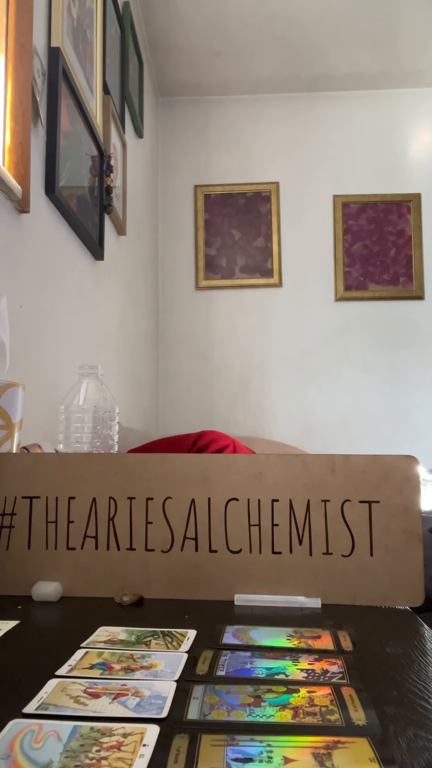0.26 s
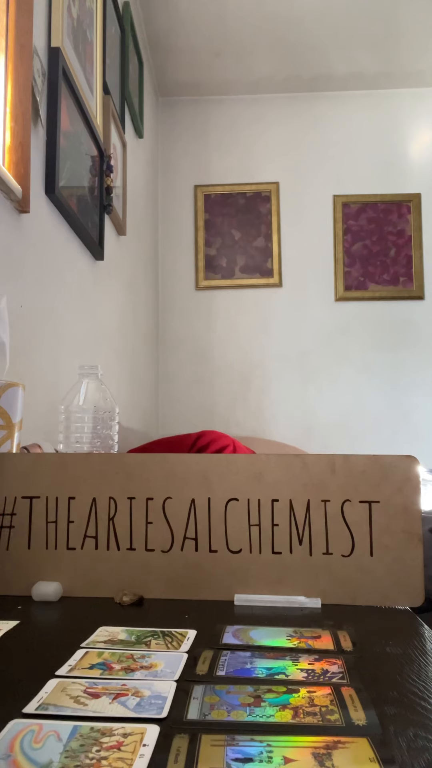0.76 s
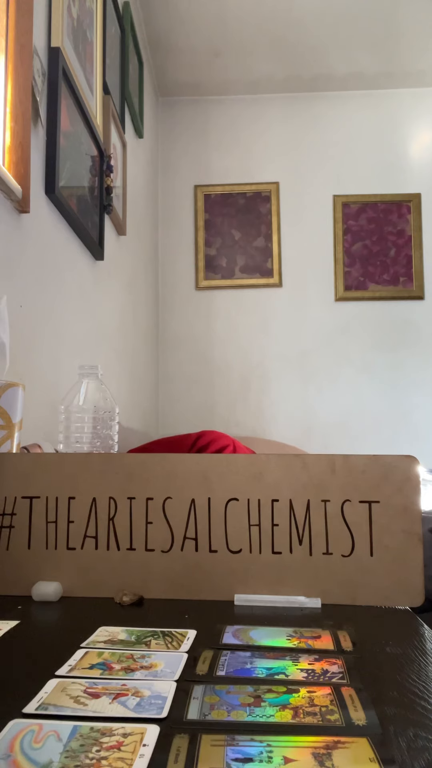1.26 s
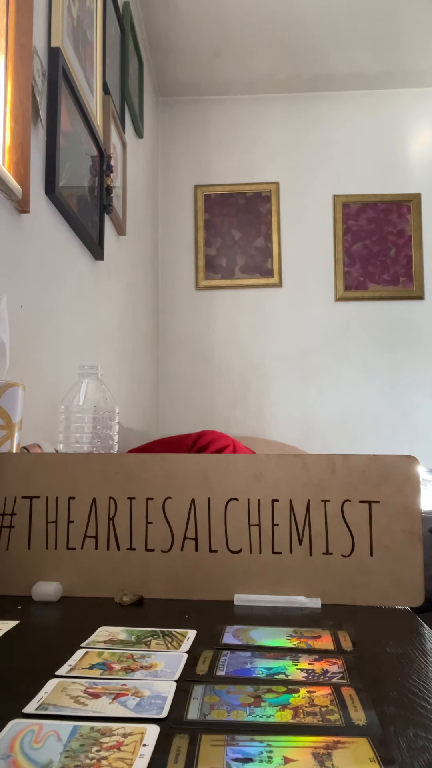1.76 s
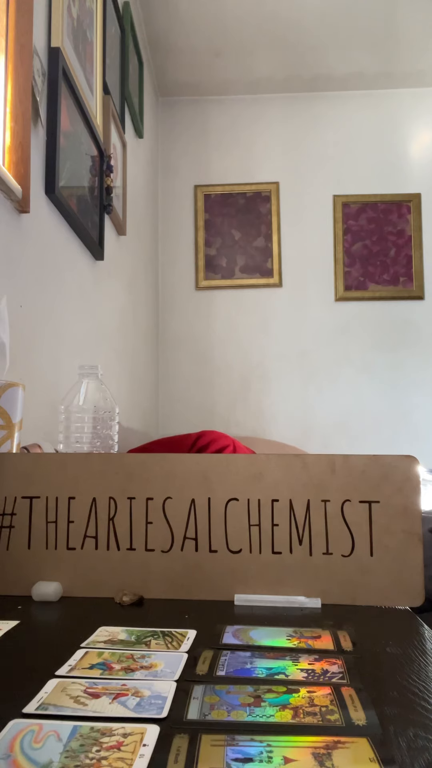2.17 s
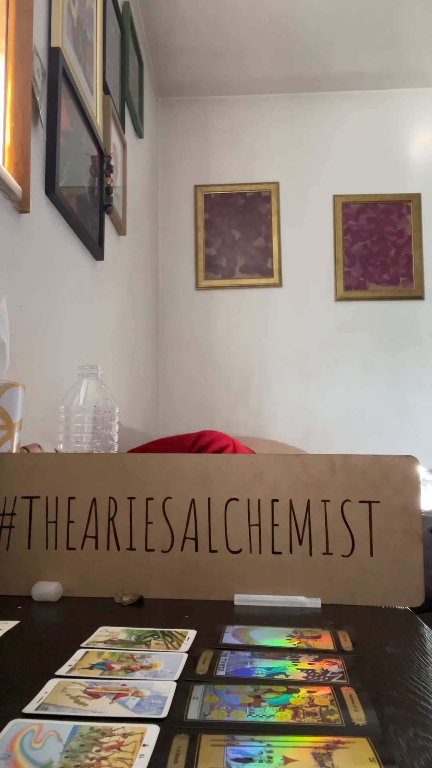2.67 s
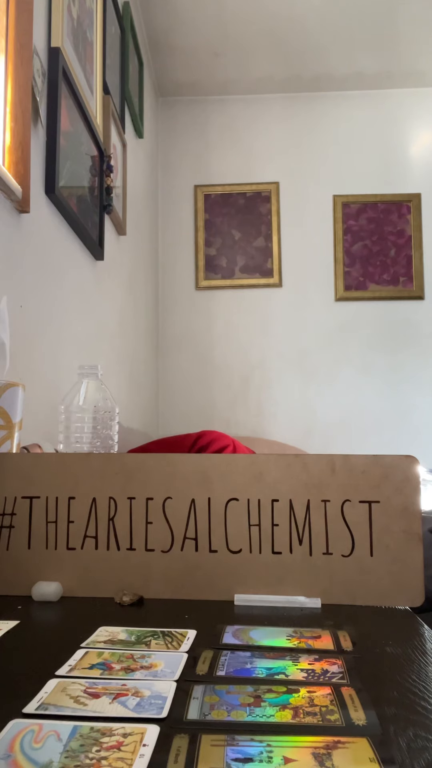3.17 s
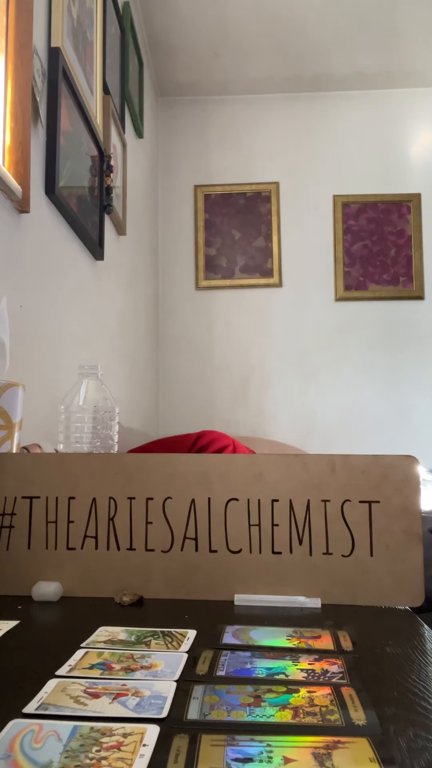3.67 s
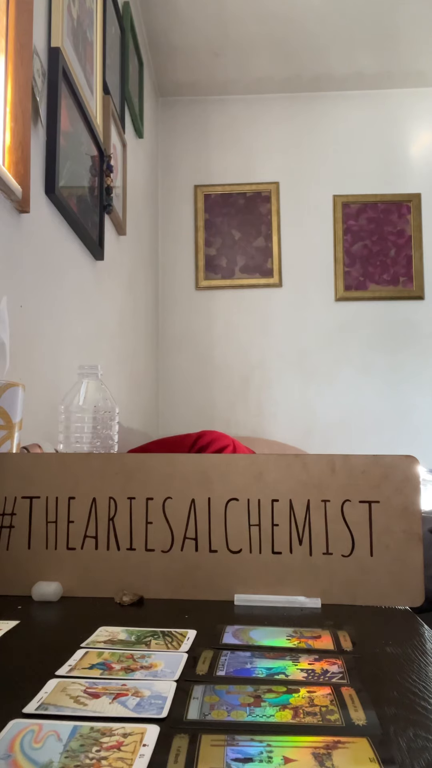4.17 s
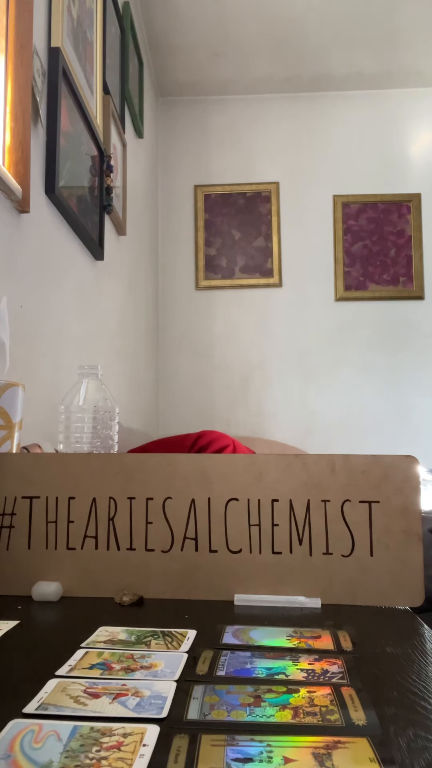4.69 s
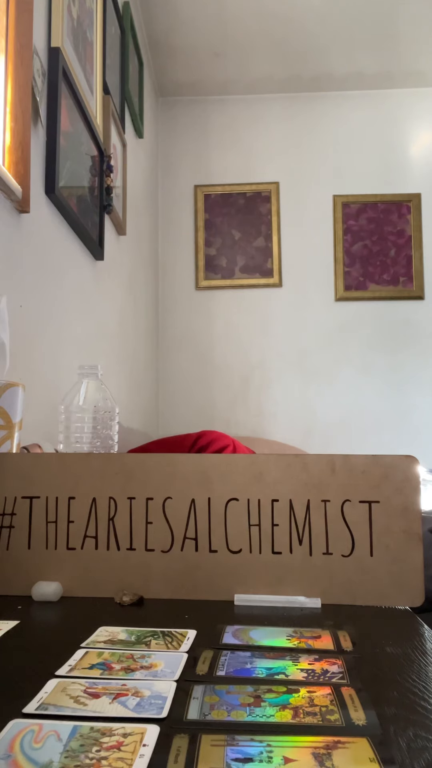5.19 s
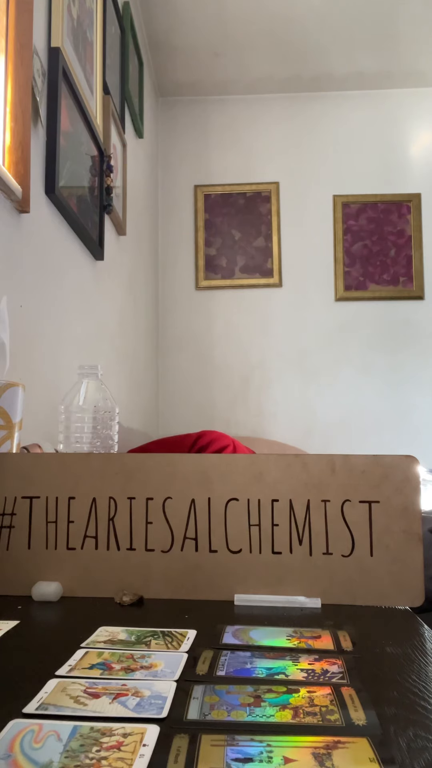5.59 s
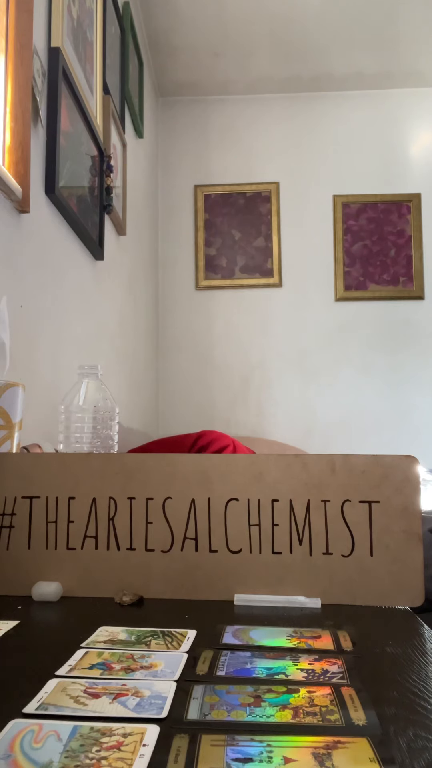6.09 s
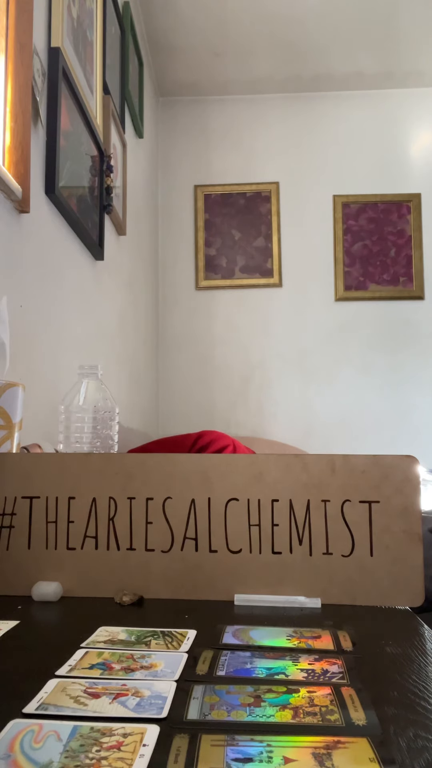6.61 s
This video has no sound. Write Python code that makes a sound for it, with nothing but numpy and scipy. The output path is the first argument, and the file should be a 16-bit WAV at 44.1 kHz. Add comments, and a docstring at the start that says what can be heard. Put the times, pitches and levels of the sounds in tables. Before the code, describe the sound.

A quick, bright clatter of card packets slapping together opens at once, with short room echoes and low bumps on the table. Softer taps and a sliding rub follow, with a brief renewed snapping before two seconds. The rest is near silence: sparse ticks, slight card friction and faint room hum, until a lone sharper click at six seconds. Close stereo pickup.

```python
"""A quiet room: behind a cardboard screen a deck of stiff cards is shuffled by hand, then held and shifted.
Packets slap and snap: ringing clicks with a deck thump and an edge crack, followed by room echoes.
Card faces slide on each other as clumped friction grains; the table rumbles in noise under the hands.
Two microphone ports hear the cards with different phase; below lie a faint noise hum and a low sine tone."""
import sys
import numpy as np
from scipy import signal
from scipy.fft import rfft, irfft, next_fast_len
from scipy.io import wavfile

SR = 44100
rng = np.random.default_rng(int(sys.argv[2]) if len(sys.argv) > 2 else 0)


def inscribe(sig):
    """Save sig as 16-bit PCM at rate SR to the path in sys.argv[1].

    A 1-D sig is mono; a 2-D sig holds one channel per row.
    Samples are clipped to [-1, 1] before scaling.
    """
    pcm = np.round(np.clip(np.atleast_2d(sig).T, -1, 1) * 32767)
    wavfile.write(sys.argv[1], SR, pcm.astype(np.int16))


N = 302085      # samples
COARSE_STEP = 16      # samples between points of a movement's envelope

# Card snaps. Each row: time in seconds, peak in dB, ring in Hz, thump peak in dB re the snap peak,
# crack peak in dB re the snap peak, left over right in dB.
CARD_SNAPS = [(.1411, -28, 2800, -7.5, -16, -5), (.1555, -7.5, 2260, -11, -10, 0),
              (.1604, -7.5, 2310, -16, -15, 0), (.175, -17.5, 2320, -13.5, -7, -.5),
              (.2056, -1.5, 2200, -28, -13.5, 1.5), (.2338, -22.5, 2240, -21.5, -17, -1.5),
              (.2519, -10.5, 2670, -13, -7.5, -1.5), (.2611, -10, 2380, -18, -12, 0),
              (.2648, -10, 2030, -16.5, -20, 4), (.3411, -32, 2840, -4, -30.5, -3.5),
              (.3544, -36, 2150, -2, -21, 1.5), (.3825, -32, 2190, -3.5, -27.5, -3),
              (.402, 0, 2213, -17, -11, 1.5), (.4158, -15, 3600, -17, -20, 10),
              (.4374, -20.5, 2170, -4, -3, -2), (.4721, -5.5, 2250, -19.5, -9, 1),
              (.4874, -17.5, 3450, -25.5, -9.5, -3.5), (.5332, -18, 2140, -5, -13.5, 0),
              (.596, -7.5, 2250, -15.5, -11, 2), (.6136, -22.5, 4200, -13, -12, -1),
              (.632, -9.5, 2480, -10, -11.5, -1), (.6956, -10.5, 2710, -14.5, -6.5, 0),
              (.7316, -3.5, 2560, -15.5, -8, -3), (.7398, -5.5, 2390, -26, -34, 2),
              (.7464, -10, 2440, -26, -26, 2), (.7732, -20, 2540, -28.5, -36.5, 3.5),
              (.8108, -20, 2500, -10, -9, .5), (.856, -18.5, 2280, -29, -14, 2.5),
              (.8762, -4, 2806, -22, -14.5, -0.5), (.8854, -14, 2120, -7, -13.5, -1),
              (.9351, -24, 2240, -7.5, -3, 1), (.98, -19, 4700, -14, -26.5, -6),
              (.9887, -21.5, 1700, -10, -20.5, -3.5), (1.0015, -12, 1490, -12, -11.5, .5),
              (1.0157, -14, 2520, -14.5, -22, -1), (1.0285, -12, 2530, -8.5, -17.5, 0.5),
              (1.0365, -8, 2370, -3.5, -8, 0), (1.0414, -6, 2350, -22.5, -11, 8),
              (1.0518, -11, 1314, -10.5, -18, -9.5), (1.0661, -18.5, 2640, -13, -28, 2),
              (1.175, -25.5, 1530, -6, -47, 6), (1.3054, -38, 2450, -3.5, -6, 4.5),
              (1.3698, -28, 3720, -35, -4, -5.5), (1.381, -40, 1400, -12, 1, 0),
              (1.475, -28.5, 2560, -13, -9, -2), (1.5836, -29, 2520, -24, -11, -2),
              (1.611, -22, 2050, -21.5, -17.5, 0), (1.6509, -24, 1680, -11.5, -26, -4.5),
              (1.748, -13.5, 2640, -15, -15.5, -2), (1.7614, -10, 2580, -18.5, -10.5, -1),
              (1.7679, -13.5, 2750, -12, -12, -3.5), (1.7826, -28, 2560, -12, -10, 4.5),
              (1.8096, -32.5, 2440, -6.5, -25, -10.5), (1.8246, -36, 2920, -3, -28, 12.5),
              (1.8362, -17.5, 2480, -14, -36, 0), (1.8676, -28.5, 1460, -12, -30, 1),
              (1.9394, -24, 2680, -4.5, -3, 2.5), (2.0313, -30, 2270, -21, -33, -3),
              (2.1615, -46.5, 2080, -23, -28, -8), (2.4969, -43, 2960, 1, -12, 0),
              (2.547, -37, 2300, -23, -25, 4), (2.6448, -43, 2430, -9, -3, 6),
              (2.819, -40.5, 2390, -11.5, -24, 4), (2.9077, -23, 3210, -40, -16, 3),
              (3.034, -46.5, 2944, -11, -19, 8), (3.1058, -49.5, 3040, -31, -29.5, -6),
              (3.3039, -45, 2230, -38.5, -22.5, 11.5), (3.3558, -47, 2130, -14, -16.5, 4.5),
              (3.6196, -51.5, 1566, -21, 2, 1), (3.9943, -54, 2840, -27.5, -13, 3),
              (4.2676, -47.5, 2140, 1, -8, 5), (4.8045, -50.5, 1423, -21, -11, 4),
              (5.8341, -46, 2300, -1, -35, 5), (5.973, -35.5, 1530, -8, -9, -1),
              (6.002, -39, 2077, -28, -6, -20), (6.0096, -13.5, 3350, -27.5, -15.5, 10),
              (6.0864, -39, 2620, -3, -22, 2), (6.4017, -51.5, 1984, 0, -16.5, 3),
              (6.614, -50.5, 2500, -7, -25, 0), (6.807, -27, 2415, -21, -13, 3)]
# Colour of snaps. Each row: frequency in Hz, spectral level in dB per Hz.
SNAP_COLOUR = [(88, -43.5), (150, -16.5), (343, -10.5), (425, -10.5), (560, -8.5), (814, -9), (1070, -18),
               (1560, -12.5), (2010, -12.5), (2220, -12), (3290, -16), (3930, -10.5), (5270, -14.5),
               (9890, -24.5), (16500, -39.5)]
SNAP_T60_S, SNAP_RISE_S = .028, .0014      # both scaled per band by a stretch
RING_DB_AT_0_DB_PEAK, RING_DB_PER_DB_SOFTER, RING_WIDTH_HZ = 8.5, .21, 88.0
TICK_DB, CLICK_SPREAD_DB = 13.0, 1.5


def snaps():
    """A landing packet ticks and sprays edge clicks; air between cards rings, deck thumps, edges crack."""
    lead, size = 1024, 4096      # samples before the landing, samples in all
    out = np.zeros((2, N + size))
    t = (np.arange(size) - lead) / SR
    hz = np.arange(size // 2 + 1) * SR / size
    to_ports = path(hz, SNAP_COLOUR)
    own_share = at_hz(PORT_DIFFERENCE, hz, axis=2)
    low, middle, high = split(hz)
    for time_s, peak_db, ring_hz, thump_db, crack_db, pan_db in CARD_SNAPS:
        unevenness_db = CLICK_SPREAD_DB * rng.standard_normal(size // 32).repeat(32)
        spray = rng.standard_normal((3, size)) * from_db(unevenness_db)
        spray[0, lead] += from_db(TICK_DB)      # the leading edge touches first
        # a softer snap rings purer
        ring_db = RING_DB_AT_0_DB_PEAK - RING_DB_PER_DB_SOFTER * peak_db
        main_ring = resonance(hz, ring_hz, RING_WIDTH_HZ, ring_db)
        weaker_gap = resonance(hz, ring_hz * rng.uniform(.6, 1.8), 400, 2)      # new each time
        ring = main_ring * weaker_gap
        first = round(time_s * SR) - lead
        pan = np.array([[.5], [-.5]]) * pan_db
        # lows last longer, the crack dies first
        for band_db, band, stretch in [(0, middle * ring, 1), (thump_db, low, 1.3), (crack_db, high, .6)]:
            rise_s = np.clip(SNAP_RISE_S * stretch, .0001, .005)
            t60_s = np.clip(SNAP_T60_S * stretch, .004, .09)
            swell = np.exp(np.minimum(t, 0) / rise_s)
            decay = from_db(-60 * np.maximum(t, 0) / t60_s)
            spectrum = rfft(spray * swell * decay)
            heard = spectrum[0] + own_share * spectrum[1:]      # shared part plus each port's own
            part = irfft(heard * to_ports * band, size)
            part = part / np.sqrt(np.mean(np.max(part ** 2, axis=1)))
            out[:, first:first + size] += from_db(peak_db + band_db + pan) * part
    return out[:, :N]


# Strokes of card over card. Each row: start in seconds, length in seconds, rub level in dB,
# change over the stroke in dB, lows in dB re rub, treble in dB re rub, swish centre in Hz.
SLIDE_STROKES = [(0, .01, -64, -5.5, 2, -36, 1580), (0.171, .12, -51.5, -9, 8, -2, 2250),
                 (.35, 0.23, -54.5, 12.5, -6.5, -12.5, 2410), (0.65, 0.28, -44, 5, -5, -19, 2360),
                 (0.88, 0.21, -43, 0.5, -2, -13.5, 2160), (1.151, 0.029, -51.5, -1.5, 2.5, -21, 1610),
                 (1.189, 0.15, -60, 4.5, -6.5, -7.5, 2530), (1.396, 0.15, -55, 14, -11, -12, 2500),
                 (1.6, .05, -48, 0, -10, -15, 1950), (1.653, 0.073, -43, 2, -7.5, -13, 2100),
                 (1.793, 0.17, -38.5, -4, -4, -13.5, 2080), (2.042, 0.097, -60.5, -1, -3.5, -13, 2000),
                 (2.171, 0.09, -54.5, -2, -16, -11.5, 2700), (2.308, 0.091, -58.5, 6.5, -11.5, -12, 4000),
                 (2.43, 0.072, -64, -2, -9, -8, 2190), (2.498, .055, -57, 3.5, -9.5, -11.5, 2150),
                 (2.581, 0.044, -56.5, -6, -4, -9, 2420), (2.632, .19, -57, 1, -8.5, -8, 2180),
                 (2.854, 0.045, -67, 5, -1, -9, 2600), (2.921, 0.059, -40, -20.5, -13, -16.5, 2290),
                 (3.024, 0.018, -57, -2, -10, -5.5, 2740), (3.112, 0.032, -63, -6.5, -21, -25, 2620),
                 (3.305, 0.16, -62, -3, -11.5, -4, 2450), (3.594, 0.037, -63, 7.5, -12.5, -11, 2000),
                 (3.784, 0.017, -76, -0.5, -14, -10, 2240), (3.897, 0.049, -64.5, -12.5, -2.5, -7.5, 2167),
                 (4.003, 0.046, -64, 1.5, -10, -3, 2600), (4.155, 0.073, -76, 7.5, -24, 2.5, 3280),
                 (4.278, 0.017, -58, -11, -2, -2, 2120), (4.556, 0.11, -76.5, 9.5, -2, -11, 2316),
                 (4.733, 0.06, -67, -1, -13, -11, 2650), (4.809, 0.082, -62, -14, -7.5, -8, 1680),
                 (4.963, 0.18, -68, -1.5, -18, -12.5, 1600), (5.318, 0.014, -72, -4, -25, -6.5, 2720),
                 (5.39, 0.039, -71, -10, -2, -9, 1783), (5.578, 0.13, -73, 2.5, -7.5, -5.5, 2375),
                 (5.844, 0.038, -72, -6, 7.5, -35, 2060), (5.975, 0.033, -70, 1, -7, -11, 3100),
                 (6.016, 0.088, -43.5, -5.5, -13.5, -17.5, 3300), (6.12, 0.096, -59.5, -14, -22, -30, 3200),
                 (6.267, 0.099, -74.5, 2.5, -26, -4.5, 2604), (6.408, 0.039, -68.5, -9, -2, -15, 1850),
                 (6.466, 0.088, -72, 2, -3.5, -8, 2540), (6.617, 0.076, -67.5, -9.5, -6.5, -16, 2565),
                 (6.736, 0.062, -72.5, 7, -4, -9.5, 2400), (6.817, 0.037, -56.5, 9.5, -11.5, -7.5, 2400)]
# Colour of sliding. Each row: frequency in Hz, spectral level in dB per Hz.
SLIDE_COLOUR = [(120, -39.5), (200, -18.5), (411, -15.5), (459, -14), (784, -12.5), (1030, -16),
                (1230, -13.5), (1500, 0.5), (1640, -10), (1770, -5.5), (2800, -4.5), (3190, -7),
                (3450, -9.5), (3900, -4.5), (10800, -20), (13500, -25), (16500, -57)]
STROKE_RISE_DB_PER_S, STROKE_FALL_DB_PER_S = 600.5, 300
GRAINS_PER_S, GRAIN_DB = 4200.0, -1.0      # rate before clumping; dB per unit of exponential chance
SWISH_LIFT_DB, SWISH_WIDTH_OCT, PATCHY_DB = 4.5, .27, .5


def sliding():
    """Faces catch and let go: clumped grains over friction noise; the gap lifts a wandering band."""
    power = np.array([gesture(*row[:4], STROKE_RISE_DB_PER_S, STROKE_FALL_DB_PER_S) for row in SLIDE_STROKES])
    power = power + 1e-30
    share = power / power.sum(axis=0)      # the loudest stroke dominates the colour
    colours = np.transpose(SLIDE_STROKES)[4:]
    lows_db, treble_db, swish_hz = [full_rate(column @ share) for column in colours]

    born = rng.random(N) < GRAINS_PER_S * from_db(4.0 * drift(25.0)) / SR
    grains = born * from_db(GRAIN_DB * np.minimum(rng.exponential(1, N), 5))
    noise = (rms_one(grains) + .5) * rng.standard_normal((3, N))
    rub = noise[0] + shaped(noise[1:], lambda hz: at_hz(PORT_DIFFERENCE, hz, axis=2))
    rub = shaped(rub, lambda hz: path(hz, SLIDE_COLOUR))
    low, middle, high = [rms_one(shaped(rub, lambda hz: split(hz)[k])) for k in range(3)]

    swish = 0
    for centre_hz in 2 ** np.arange(10, 12.6, 1 / 3):      # overlapping triangular bands
        octaves_off = lambda hz: np.abs(np.log2((hz + 1) / centre_hz))
        third = shaped(middle, lambda hz: np.clip(1 - 3 * octaves_off(hz), 0, 1))
        lift_db = SWISH_LIFT_DB * np.exp(-(np.log2(swish_hz / centre_hz) / SWISH_WIDTH_OCT) ** 2)
        swish = swish + from_db(lift_db + PATCHY_DB * drift(28.0)) * third
    lows = from_db(lows_db + .72 * drift(20.0)) * low
    treble = from_db(treble_db + .72 * drift(20.0)) * high
    return np.sqrt(full_rate(power.sum(axis=0))) * (lows + .91 * swish + treble)


# Hands and deck bump the table. Each row: start in seconds, length in seconds, rumble level in dB.
TABLE_BUMPS = [(0, 0.046, -60), (0.167, 0.022, -41.5), (.21, 0.018, -42.5), (0.257, 0.013, -36.5),
               (0.401, 0.014, -38.5), (0.463, .03, -44.5), (0.535, 0.051, -47.5), (0.577, .055, -39),
               (0.733, 0.016, -32), (0.814, .02, -46), (0.878, 0.046, -38), (0.983, 0.017, -40.5),
               (1.04, 0.027, -35), (1.173, 0.082, -56), (1.307, 0.031, -52.5), (1.615, 0.037, -51.5),
               (1.759, 0.034, -40), (1.823, 0.17, -52.5), (2.037, 0.23, -69.5), (2.49, 0.29, -71.5),
               (2.911, 0.02, -60.5), (3.33, 0.087, -68.5), (4.219, 0.054, -69), (4.547, .2, -71),
               (4.818, 0.017, -63.5), (5.626, 0.092, -59), (5.995, 0.13, -62.5), (6.393, 0.31, -69),
               (6.8, 0.055, -59.5)]
# Colour of the rumble. Each row: frequency in Hz, relative level in dB per Hz.
RUMBLE_COLOUR = [(18, -38), (30, -4), (59, 8.5), (151, 1), (238, -3), (295, -8), (344, -9), (400, -6.5),
                 (520, -31), (880, -120)]
BUMP_RISE_DB_PER_S, BUMP_FALL_DB_PER_S, RESTING_HANDS_DB = 501.5, 349.5, -75.5


def bumps():
    """Each bump sets the table rumbling over the weight of the resting hands."""
    power = sum(gesture(start_s, length_s, db, 0, BUMP_RISE_DB_PER_S, BUMP_FALL_DB_PER_S)
                for start_s, length_s, db in TABLE_BUMPS)
    level = np.sqrt(full_rate(power) + from_db(2 * RESTING_HANDS_DB))
    rumble = diffuse(rng.standard_normal((2, N)), RUMBLE_COLOUR)
    return level * from_db(2.0 * drift(36.0)) * rumble


ROOM_T60_S, ROOM_DB, WALL_CUT_HZ = .23, -12.5, 2800


def room(x):
    """Scattered echoes: a dying noise, duller as it goes, most alike at both ports in the bass."""
    t = np.arange(SR // 2) / SR
    nearly_flat = [(20, .0095), (20000, .016)]      # Hz, dB
    tail = diffuse(rng.standard_normal((2, len(t))), nearly_flat) * (t > .004)
    dull = shaped(tail, lambda hz: 1 / (1 + (hz / WALL_CUT_HZ) ** 2))
    bright = tail - dull
    tail = dull * from_db(-60 * t / ROOM_T60_S) + bright * from_db(-60 * t / (.82 * ROOM_T60_S))
    tail = tail / np.sqrt(np.sum(tail ** 2, axis=1, keepdims=True))
    return from_db(ROOM_DB) * signal.fftconvolve(x, tail, axes=1)[:, :N]


# Colour of the room hum. Each row: frequency in Hz, relative level in dB per Hz.
HUM_COLOUR = [(15, -35.5), (25, -8), (91, 1), (225, -17.5), (425, -27.5), (684, -15.5), (1820, -32),
              (2250, -22.5), (4990, -32), (8470, -38), (14000, -52)]
HUM_DB_RMS = -72


def room_hum():
    """Steady diffuse noise, weighted to the bass."""
    return from_db(HUM_DB_RMS) * diffuse(rng.standard_normal((2, N)), HUM_COLOUR)


# Level of the low tone. Each row: time in seconds, level in dB rms before wavering.
TONE_LEVEL = [(0, -92), (4.4, -86.5), (4.6, -79), (4.9, -80), (5.1, -90.5), (5.6, -90), (5.9, -80.5),
              (6.85, -77.5)]
TONE_HZ, TONE_WAVER_DB = 226, 2.5


def low_tone():
    """A faint sine that comes and goes, its level wavering."""
    t = np.arange(N) / SR
    level_db = np.interp(t, *np.transpose(TONE_LEVEL)) + TONE_WAVER_DB * drift(4.4)
    return np.sqrt(2) * from_db(level_db) * np.sin(2 * np.pi * TONE_HZ * t)


# Resonances of screen and table top. Each row: centre in Hz, width in Hz, added peak in dB re the path.
SCREEN_MODES = [(420, 28, -1.5), (860, 200, 1), (1579, 71, 0), (2186, 36, 0.5), (2485, 15, -7),
                (2584, 310, -9.5), (2994, 370, 1.5), (4073, 89, -4)]
# Port balance. Each row: frequency in Hz, left over right in dB.
PORT_BALANCE = [(60, -1.0), (150, -1.5), (380, -3.5), (950, -2.0), (2380, -1.0), (5980, -0.5), (15000, 0.0)]
# The two ports. Each row: frequency in Hz, phase in radians by which left leads,
# amplitude each port hears alone re the shared sound.
PORT_DIFFERENCE = [(100, 0, .12), (300, 0, .35), (700, 0, .6), (1400, 1.2, .7), (2000, .6, .7),
                   (3450, 2.8, 1.1), (5500, 3.1, 1), (6200, 5.1, 1.2), (7300, 5.9, .55), (9000, 5.3, .65),
                   (11700, 3.8, .45), (13200, 3.15, .12)]


def path(hz, spectrum):
    """From the cards past the screen to the two ports: colour, resonances, balance and phase."""
    modes = np.prod([resonance(hz, *mode) for mode in SCREEN_MODES], axis=0)
    side = np.array([[.5], [-.5]])
    balance = from_db(side * at_hz(PORT_BALANCE, hz))
    phase = np.exp(1j * side * at_hz(PORT_DIFFERENCE, hz))
    return from_db(at_hz(spectrum, hz)) * modes * balance * phase


def resonance(hz, centre_hz, width_hz, db):
    """The direct path, gain 1, plus a resonance of peak gain db."""
    return 1 + from_db(db) / (1 + 2j * (hz - centre_hz) / width_hz)


def split(hz):
    """Gains for the lows, middle and treble of a card sound."""
    low = 1 / (1 + (hz / 1050) ** 8)
    high = 1 / (1 + (5000 / (hz + 1)) ** 8)
    return low, (1 - low) * (1 - high), high


# Diffuse sound. Each row: frequency in Hz, left-right likeness from 1 (same) to -1 (opposite).
PORT_LIKENESS = [(60, .985), (130, .95), (290, .75), (640, .25), (1400, 0), (6800, -.1), (15000, -.6)]


def diffuse(pair, spectrum):
    """Two unrelated signals become a coloured left and right of set likeness; rms 1."""
    alike = lambda hz: np.clip(at_hz(PORT_LIKENESS, hz), -1, 1)
    colour = lambda hz: from_db(at_hz(spectrum, hz))
    mid = shaped(pair[0], lambda hz: colour(hz) * np.sqrt(1 + alike(hz)))
    side = shaped(pair[1], lambda hz: colour(hz) * np.sqrt(1 - alike(hz)))
    return rms_one(np.array([mid + side, mid - side]))


def gesture(start_s, length_s, db, change_db, rise_db_per_s, fall_db_per_s):
    """Coarse power of one movement: swells up to its start, drifts in level, then dies away."""
    t = np.arange(0, N, COARSE_STEP) / SR - start_s
    held_db = db + change_db * np.clip(t / max(length_s, .002), 0, 1)
    rise_db = rise_db_per_s * np.minimum(t, 0)
    fall_db = fall_db_per_s * np.maximum(t - length_s, 0)
    return from_db(2 * (held_db + rise_db - fall_db))


def full_rate(coarse):
    """Interpolate a coarse envelope to every sample."""
    return np.interp(np.arange(N), np.arange(0, N, COARSE_STEP), coarse)


def drift(rate_hz):
    """Slow random wander of rms 1."""
    return rms_one(shaped(rng.standard_normal(N), lambda hz: 1 / (1 + (hz / rate_hz) ** 2)))


def shaped(x, gain):
    """Multiply the spectrum by gain(Hz)."""
    size = next_fast_len(x.shape[-1])
    hz = np.arange(size // 2 + 1) * SR / size
    return irfft(rfft(x, size) * gain(hz), size)[..., :x.shape[-1]]


def at_hz(points, hz, axis=1):
    """Read a column of a spectrum table on a log-frequency axis."""
    p = np.array(points)
    return np.interp(np.log(hz + 1), np.log(p[:, 0] + 1), p[:, axis])


def rms_one(x):
    """Scale to rms 1."""
    return x / np.sqrt(np.mean(x ** 2) + 1e-20)


def from_db(db):
    """Decibels to amplitude gain."""
    return 10 ** (np.asarray(db) / 20)


def scene():
    """Snaps with their echoes, sliding, table rumble, room hum and low tone."""
    hits = snaps()
    return hits + room(hits) + sliding() + bumps() + room_hum() + low_tone()


def record(dry):
    """The capsules lose deep bass and lift the region of 12 kHz; peaks are rounded, the top is cut."""
    lift = lambda hz: resonance(hz, 12000.0, 2300.0, 2.5)
    bass_cut = lambda hz: 1 / np.sqrt(1 + (44.0 / (hz + 1)) ** 6)
    heard = shaped(dry, lambda hz: lift(hz) * bass_cut(hz))
    rounded = .95 * np.tanh(heard / .95)
    top_cut = signal.cheby2(14, 90, 17500, fs=SR, output="sos")      # 90 dB down from 17.5 kHz
    return signal.sosfilt(top_cut, rounded)


dry = scene()
out = record(dry)
inscribe(out)
```